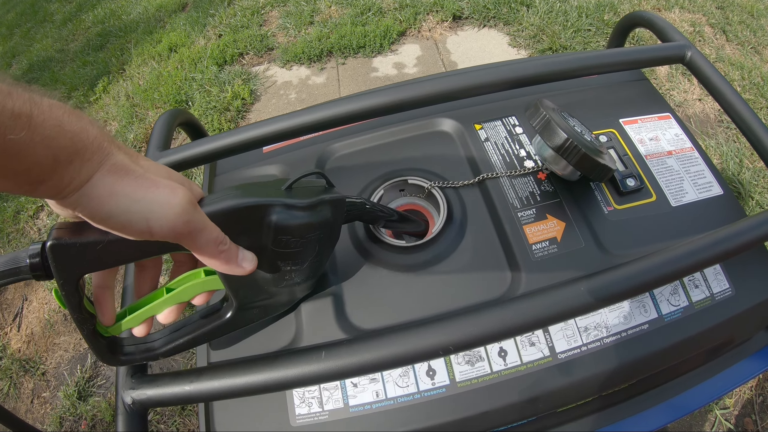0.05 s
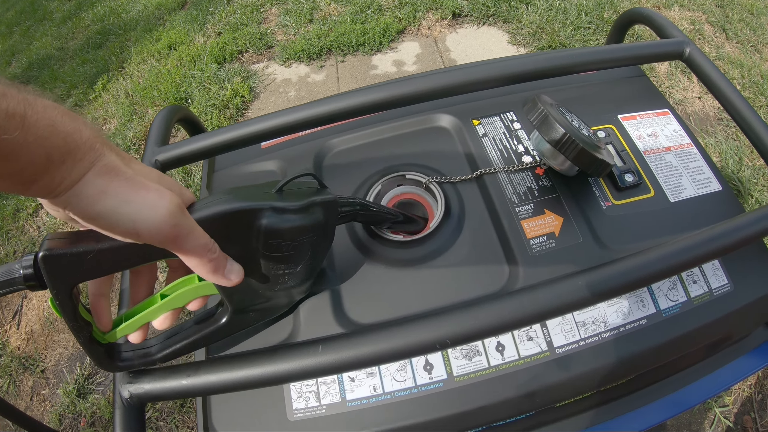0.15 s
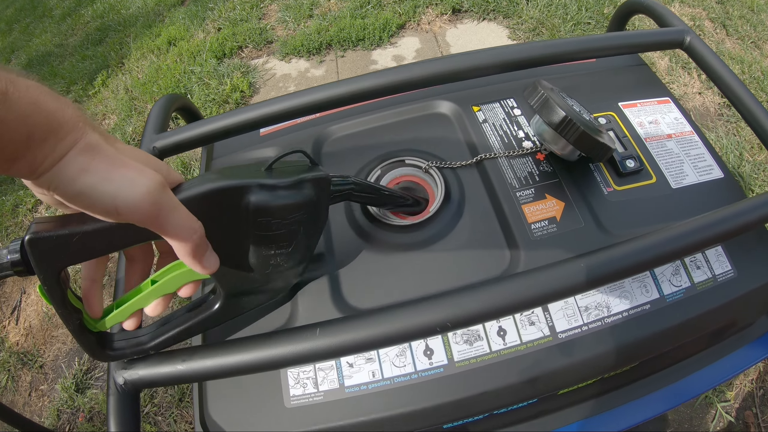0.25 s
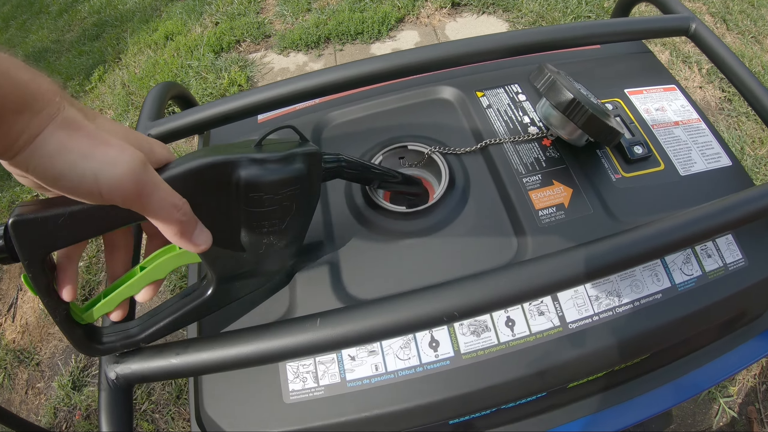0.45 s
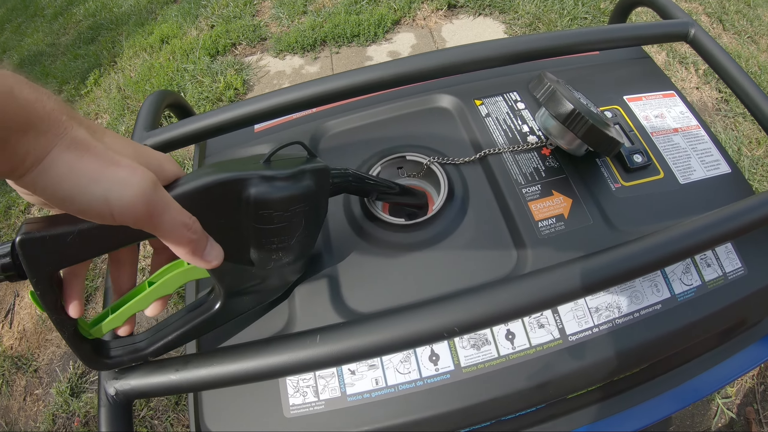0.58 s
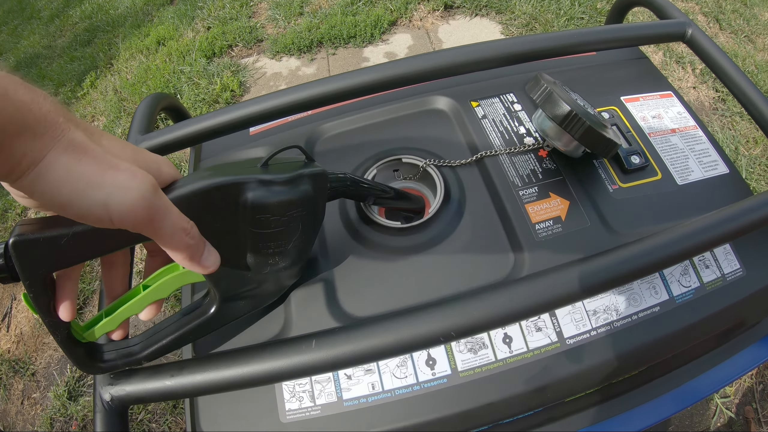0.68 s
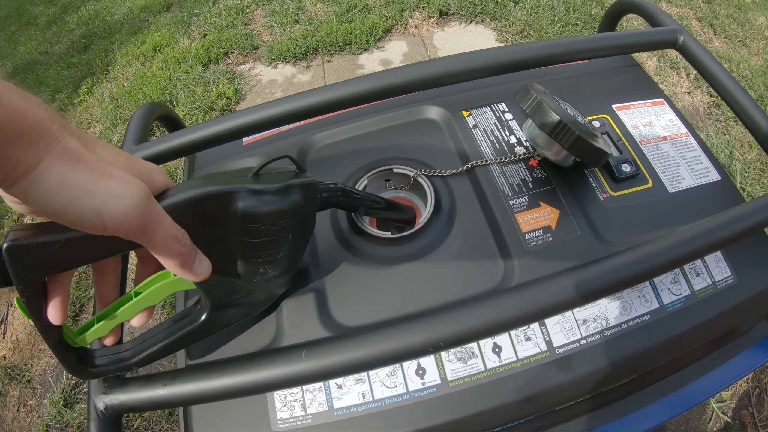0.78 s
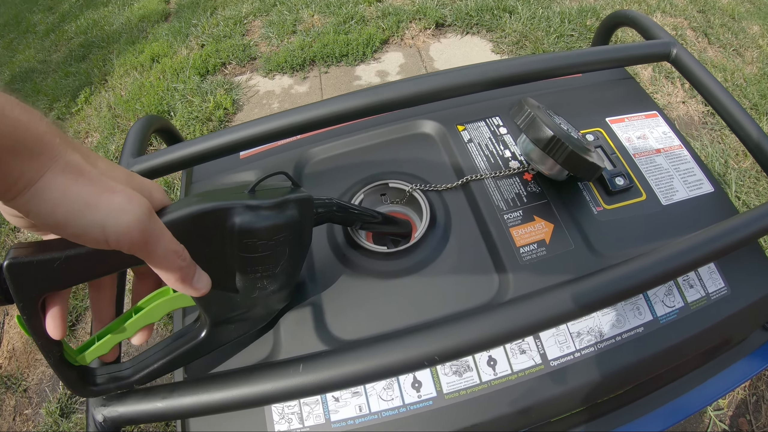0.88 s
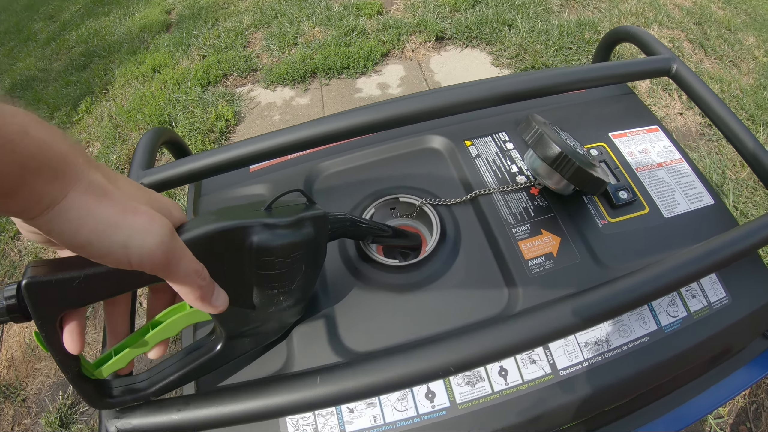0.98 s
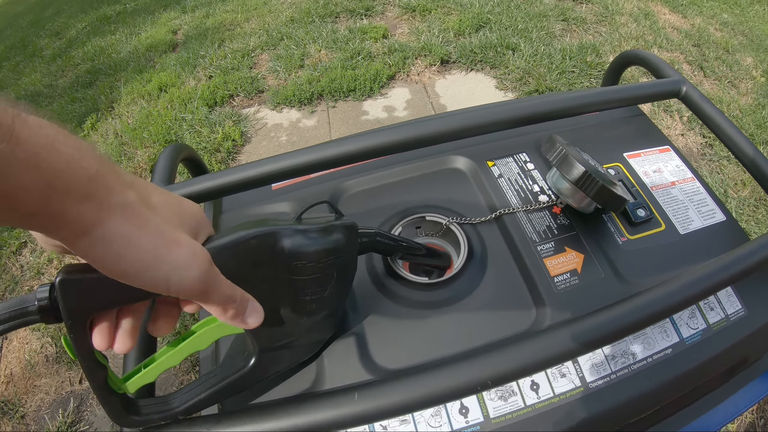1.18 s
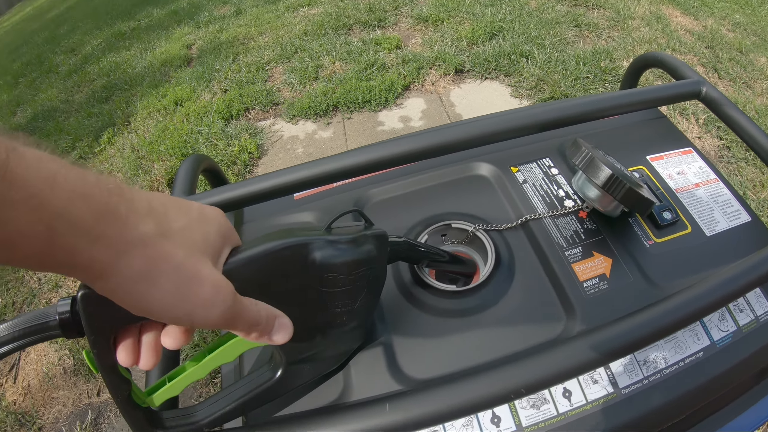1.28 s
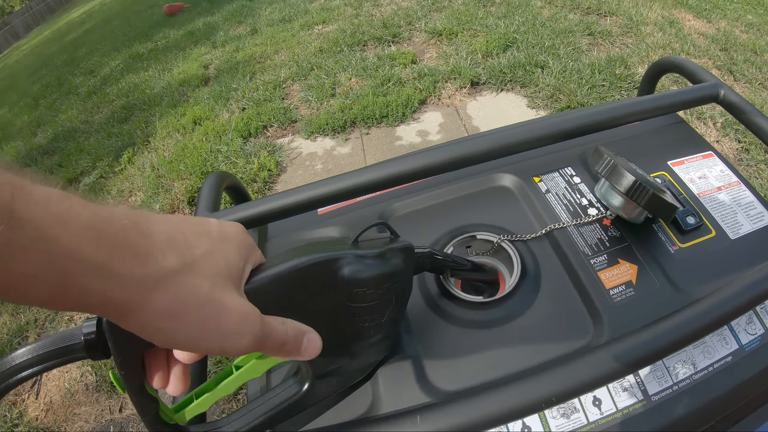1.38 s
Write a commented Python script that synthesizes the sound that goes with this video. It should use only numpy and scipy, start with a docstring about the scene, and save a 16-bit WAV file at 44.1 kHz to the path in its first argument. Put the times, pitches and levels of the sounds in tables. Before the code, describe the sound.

Hollow clunks of a fuel nozzle against a tank, then light ticks over a faint hiss.

```python
"""Fuel nozzle in a plastic tank

Outdoors and close by, a nozzle shifts in the filler neck. Two loud knocks and lighter contacts excite
the modes of spout, housing, tank walls and enclosed air; between the knocks, friction on the rim makes
the spout scrape and judder. Then the hand changes its grip with damped bumps and dry ticks.
Behind lie a low rumble, a far bird and a steady high hiss up to about 10 kHz; above that come a gap
and a faint top band from audio coding."""
import sys
import numpy as np
from scipy import signal
from scipy.fft import rfft, irfft
from scipy.io import wavfile

SR = 44100
rng = np.random.default_rng(int(sys.argv[2]) if len(sys.argv) > 2 else 0)


def transcribe(signal):
    """Save signal, clipped to [-1, 1], as a 16-bit WAV file at the path in sys.argv[1]."""
    frames = np.atleast_2d(signal).T
    limited = np.clip(frames, -1, 1)
    pcm = np.round(limited * 32767).astype(np.int16)
    wavfile.write(sys.argv[1], SR, pcm)


N = 63945
T = np.arange(N) / SR

# Contacts of spout and tank: start_s, thud_db, boom_db, walls_db, wall_tilt_db_per_octave,
# low_ring_db, nozzle_ring_db, clack_db
KNOCKS = [(0.102, -57, -64, -48.5, -12, -48.5, -59, -43.5), (0.206, -54, -48, -52, 3, -36.5, -42.5, -46),
          (.237, -20, -14, -20, -3.5, -22.5, -33, -16.5), (.274, -47, -45, -35, 3.5, -28, -42.5, -29),
          (0.377, -16, -46, -34, -9, -29.5, -42, -49), (0.4662, -37, -33.5, -27, 0.5, -42, -29.5, -20),
          (.485, -45, -50, -35.5, -10.5, -27, -31, -52), (.575, -9.5, -21.5, -22.5, 4.5, -19, -35.5, -19.5),
          (0.596, -24, -36, -38, -5, -34, -48, -28), (.629, -35, -21, -35, 1, -34, -52, -31),
          (0.711, -22, -24.5, -59, -6, -43, -66, -38.5)]
# Left-right coherence of close sounds: frequency_hz, correlation
NEAR_COHERENCE = [(250, 1), (600, 0.94), (1100, 0.36), (5000, 0.9), (12000, 0.32)]


def from_db(db):
    """Amplitude grows tenfold for every 20 dB."""
    return 10 ** (np.asarray(db) / 20)


def at_hz(points, hz):
    """Interpolation on a logarithmic frequency axis."""
    frequencies, values = np.transpose(points)
    return np.interp(np.log(hz + 1e-3), np.log(frequencies), values)


def noise(spectrum, coherence):
    """Random-phase stereo noise of unit rms; the mid-side balance sets its coherence."""
    hz = np.arange(N // 2 + 1) * SR / N
    mid, side = np.exp(2j * np.pi * rng.random((2, len(hz))))
    correlation = np.clip(at_hz(coherence, hz), -1, 1)
    stereo = np.sqrt(1 + correlation) * mid + np.sqrt(1 - correlation) * side * [[1], [-1]]
    x = irfft(from_db(at_hz(spectrum, hz)) * stereo, N)
    return x / x.std()


def drift(per_s):
    """Random modulation of unit standard deviation."""
    x = np.interp(T * per_s, np.arange(4000), rng.standard_normal(4000))
    return x / x.std()


def fade(t60_s, start_s=0):
    """Exponential decay from 1 at start_s, losing 60 dB in t60_s."""
    return (T >= start_s) * np.exp(-np.log(1000) * np.maximum(T - start_s, 0) / t60_s)


def rise(attack_s):
    """Exponential approach to full amplitude."""
    return 1 - np.exp(-T / attack_s)


def mode(hz, db, t60_s):
    """A normal mode vibrates freely as a damped sine."""
    return from_db(db) * fade(t60_s) * np.sin(2 * np.pi * hz * T)


def ring(modes):
    """Superposition of a struck body's modes, alternating in sign."""
    return sum((-1) ** k * mode(*row) for k, row in enumerate(modes))


def dense_ring(spectrum, attack_s):
    """Modal overlap: crowded resonances merge into noise, each octave decaying at its own rate."""
    # Decay times: frequency_hz, t60_s
    decay = [(100, 0.25), (500, 0.45), (1000, 0.54), (2500, 0.44), (8000, 0.043)]
    octave = np.log2(np.clip(np.arange(N // 2 + 1) * SR / N, 64, 16384))
    body = rfft(noise(spectrum, NEAR_COHERENCE))
    out = 0
    for k in range(6, 15):
        band = irfft(body * np.maximum(1 - abs(octave - k), 0), N)
        out = out + band * fade(at_hz(decay, 2. ** k))
    return rise(attack_s) * out


def strike(times_s, levels_db, response):
    """Convolution: every blow launches a scaled copy of the impulse response."""
    blows = np.zeros(N)
    blows[np.round(np.asarray(times_s) * SR).astype(int)] = from_db(levels_db)
    return signal.fftconvolve(blows[None], np.atleast_2d(response), axes=1)[:, :N]


def background():
    """Partly coherent noise sounds wide: wavering rumble, steady hiss and a faint audio-coding band."""
    # Hiss up to about 10 kHz, then a gap and a top band from audio coding:
    # frequency_hz, relative_density_db
    hiss_and_coding_band = [(1000, -11), (2500, -11.5), (3500, -8.5), (4700, -3.5), (6400, 2), (8200, -5.5),
                            (9800, -4.5), (10400, -15.5), (11000, -50), (14500, -27), (16000, -51)]
    # Low rumble: frequency_hz, relative_density_db
    rumble_spectrum = [(20, -37), (45, 1.5), (75, 1.5), (170, -2), (250, -9.5), (450, -9.5), (700, -27),
                       (1500, -21), (3000, -66)]
    # Envelopes: time_s, level_db
    treble_levels = [(0, -41.5), (.65, -44), (1.45, -43)]
    rumble_levels = [(0, -42), (.09, -53), (.16, -44), (.85, -44), (.96, -49), (1.05, -42), (1.14, -38.5),
                     (1.45, -44)]
    # Left-right coherence: frequency_hz, correlation
    coherence = [(400, 0.95), (1200, -0.14), (3000, 0.7), (6000, -0.26)]
    treble = from_db(np.interp(T, *np.transpose(treble_levels))) * noise(hiss_and_coding_band, coherence)
    rumble_db = np.interp(T, *np.transpose(rumble_levels)) + 1.8 * drift(per_s=12.65)
    return treble + from_db(rumble_db) * noise(rumble_spectrum, coherence)


def nozzle():
    """Impact excites modes: the damped plastic housing clacks, the metal spout rings on."""
    # Contact grit and crowded high resonances: frequency_hz, relative_density_db
    grit_spectrum = [(300, 11), (900, -19), (2000, 1), (3200, -5.5), (4300, -17), (13000, -44)]
    ring_spectrum = [(400, -0.5), (800, -1), (1400, -2), (2000, 0.5), (3200, -1.5), (4400, -15.5),
                     (9000, -25), (15000, -59)]
    # Normal modes: pitch_hz, level_db, t60_s
    spout_modes = [(808, -14.5, 0.18), (921, -7.5, 0.37), (1058, -10.5, 0.15), (1263, -9, 0.36),
                   (1740, -7, 0.17), (2424, -13.5, 0.26), (3130, -10.5, 0.23), (3234, -9, 0.16),
                   (3652, -6.5, 0.085)]
    housing_modes = [(840, -3.5, 0.023), (1200, -10, 0.017), (1827, -7, 0.027), (2170, -12.5, 0.043),
                     (3150, -6, 0.0089)]
    start_s, *_, ring_db, clack_db = np.transpose(KNOCKS)
    # Each blow lands elsewhere and favours other modes.
    scatter_db = 3.5 * rng.standard_normal((len(start_s), len(housing_modes)))
    onset = rise(attack_s=0.0004)
    grit = noise(grit_spectrum, NEAR_COHERENCE) * fade(t60_s=0.026) * onset
    spout = dense_ring(ring_spectrum, attack_s=0.0008) + ring(spout_modes)
    out = strike(start_s, clack_db - 2, grit) + strike(start_s, ring_db, spout)
    for k, row in enumerate(housing_modes):
        out = out + (-1) ** k * strike(start_s, clack_db + scatter_db[:, k], mode(*row) * onset)
    return out


def tank():
    """Shell and cavity resonance: the whole tank gives with a thud, its air booms, its walls ring."""
    # Wall modes: pitch_hz, level_db, t60_s
    wall_modes = [(198.3, -7, 0.19), (277, -13.5, 0.68), (328.8, -9.5, 0.7), (358.2, -7, 0.6),
                  (404, -6, 0.2), (446, -2, 0.44), (461, -12.5, 0.8), (548, -14, 0.9), (599.3, -3.5, 0.67),
                  (610, -12, 0.74), (649, -9, 0.29), (675, -8.5, 0.17), (749, -17.5, 0.2), (788, -7, 0.17),
                  (839, -21, 0.62), (997, -26, 0.56), (1065.6, -11.5, 0.44), (1637, -23, 0.44)]
    # Their stereo balance: frequency_hz, left_minus_right_db
    wall_pan = [(350, 1), (600, -5.5), (1000, -1)]
    # Crowded low resonances: frequency_hz, relative_density_db
    ring_spectrum = [(60, -6), (150, 7), (235, -8), (350, 2), (670, -2), (920, -11), (1400, -14.5),
                     (3000, -44)]
    start_s, thud_db, boom_db, walls_db, tilt_db, low_ring_db, *_ = np.transpose(KNOCKS)
    attack_s, lagged_s = 0.0055, start_s + 0.00186
    onset = rise(attack_s)
    punch = 1 + from_db(1.5) * fade(t60_s=0.041)
    thud = strike(lagged_s, thud_db, mode(hz=91.6, db=0, t60_s=0.077) * onset)
    boom = strike(lagged_s, boom_db, mode(hz=106.2, db=0, t60_s=0.34) * onset)
    out = thud + boom + strike(start_s, low_ring_db, dense_ring(ring_spectrum, attack_s) * punch)
    for k, (hz, db, t60_s) in enumerate(wall_modes):
        wall = (-1) ** k * mode(hz, db, t60_s) * onset
        pan = from_db(np.array([[0.5], [-0.5]]) * at_hz(wall_pan, hz))
        out = out + pan * strike(lagged_s, walls_db + tilt_db * np.log2(hz / 500), wall)
    return out


def handle_bumps():
    """Heavy damping leaves only dull bumps when hand and hose strike the handle."""
    # Blows: start_s, level_db
    bumps = [(.150, -43), (0.214, -25), (1.113, -29.5), (1.122, -27), (1.13, -25.5), (1.149, -22.5),
             (1.169, -25), (1.194, -28.5), (1.273, -28.5), (1.303, -35.5), (1.35, -34)]
    # Handle modes: pitch_hz, level_db, t60_s
    modes = [(106.3, -4.5, 0.11), (154.5, -0.5, 0.055), (196, -0.5, 0.061), (341, -11.5, 0.052),
             (447.5, -10.5, 0.077), (800, -13, 0.012)]
    return strike(*np.transpose(bumps), ring(modes) * rise(attack_s=0.00044))


def rim_scrapes():
    """Sliding friction: gritty noise swells until the spout slips free, then rings off."""
    # Slips: peak_s, level_db, rise_s
    slips = [(0.203, -43, 0.0015), (0.376, -31, 0.0064), (.432, -41, 0.001), (0.486, -32.5, 0.019)]
    # Friction noise: frequency_hz, relative_density_db
    spectrum = [(1800, 0.5), (2500, 1), (3200, 3), (4600, -4), (5840, 2), (6900, 2), (8100, -3), (9200, 4),
                (11000, -13), (15000, -18)]
    power = 0
    for peak_s, db, rise_s in slips:
        swell = (T < peak_s) * np.exp(-abs(T - peak_s) / rise_s)
        release = fade(0.056, peak_s)
        tail = from_db(-7.5) * fade(0.42, peak_s)
        power = power + (from_db(db) * (swell + release + tail)) ** 2
    grain = from_db(-drift(per_s=900))
    return np.sqrt(power) * grain * noise(spectrum, NEAR_COHERENCE)


def spout_judders():
    """Stick-slip oscillation of the spout swells into short low tones."""
    # Judders: start_s, length_s, pitch_hz, level_db
    judders = [(0.38, 0.0104, 394, -21), (.393, 0.0176, 433, -20), (0.417, 0.0083, 390, -24),
               (0.478, 0.13, 443.7, -25.5)]
    out = 0
    for start_s, length_s, hz, db in judders:
        swell = np.sin(np.pi * np.clip((T - start_s) / length_s, 0, 1))
        out = out + from_db(db) * swell * np.sin(2 * np.pi * hz * (T - start_s))
    return out


def lever_ticks():
    """Small impacts of the lever: fast-decaying noise shaped by one resonance each."""
    # Ticks: start_s, level_db, centre_hz, half_width_octaves, attack_s, t60_s
    ticks = [(1.052, -44.5, 1200, 0.42, .001, 0.079), (1.0764, -31.5, 1960, 0.13, 0.00038, 0.025),
             (1.1103, -33, 970, 0.46, 0.0004, 0.027), (1.235, -36, 462, 0.033, .0005, 0.064),
             (1.275, -36.5, 930, 0.42, 0.0045, 0.062), (1.349, -44.5, 1290, 0.4, 0.00086, 0.076)]
    hz, cutoff_hz = np.geomspace(50, 16000, 120), 4000
    rolloff_db = -10 * np.log10(1 + (hz / cutoff_hz) ** 10)
    out = 0
    for start_s, db, centre_hz, half_width, attack_s, t60_s in ticks:
        resonance_db = -10 * np.log10(1 + (np.log2(hz / centre_hz) / half_width) ** 2)
        band = noise(np.column_stack([hz, resonance_db + rolloff_db]), NEAR_COHERENCE)
        out = out + strike([start_s], [db], rise(attack_s) * fade(t60_s) * band)
    return out


def far_bird():
    """Frequency modulation: a bird's faint whistles glide, arch and waver in pitch."""
    # Notes: start_s, length_s, start_hz, end_hz, level_db
    notes = [(1.185, .072, 3810, 4010, -54), (1.316, .064, 3900, 3860, -51.5)]
    arch_hz, waver_hz = 70, 45
    out = 0
    for start_s, length_s, start_hz, end_hz, db in notes:
        progress = np.clip((T - start_s) / length_s, 0, 1)
        arch = abs(np.sin(np.pi * progress))
        hz = start_hz + (end_hz - start_hz) * progress + arch_hz * arch + waver_hz * drift(per_s=250)
        out = out + from_db(db) * np.sqrt(arch) * np.sin(2 * np.pi * np.cumsum(hz) / SR)
    return out


def scene():
    """Superposition: all layers add linearly."""
    return (background() + nozzle() + tank() + handle_bumps() + rim_scrapes() + spout_judders()
            + lever_ticks() + far_bird())


def record(dry):
    """Band limiting: the deep bass is rolled off and the top is cut steeply."""
    low_cut_hz, high_cut_hz = 65.6, 15700
    thinned = signal.sosfilt(signal.butter(2, low_cut_hz, "high", fs=SR, output="sos"), dry)
    return signal.sosfilt(signal.ellip(10, .1, 80, high_cut_hz, fs=SR, output="sos"), thinned)


dry = scene()
out = record(dry)
transcribe(out)
```